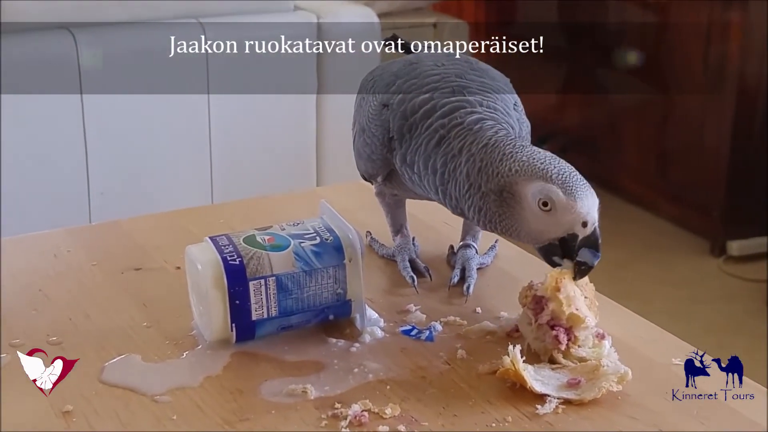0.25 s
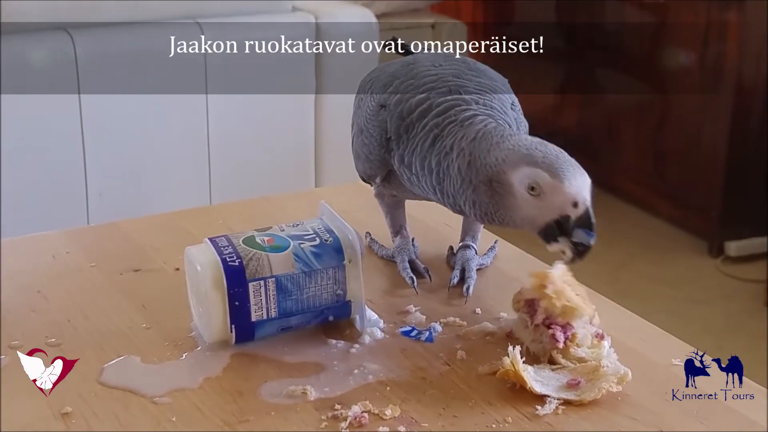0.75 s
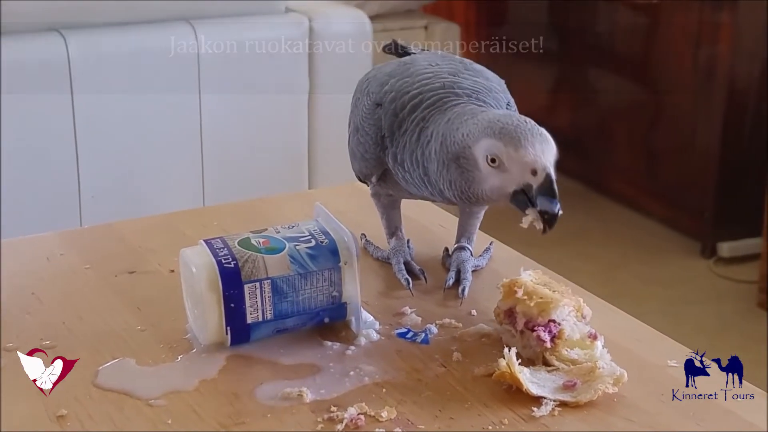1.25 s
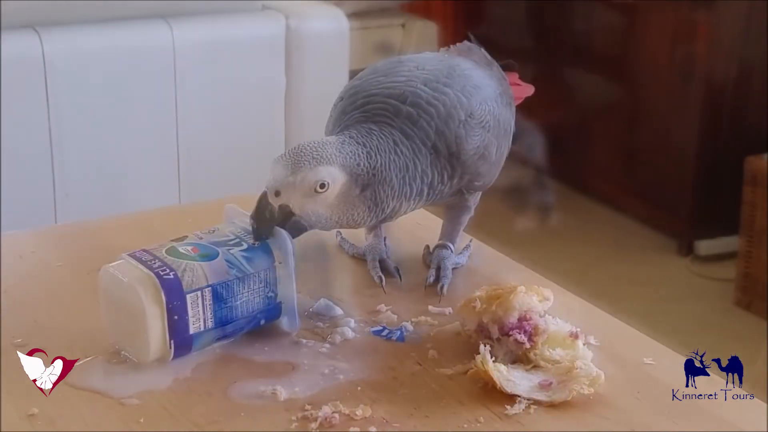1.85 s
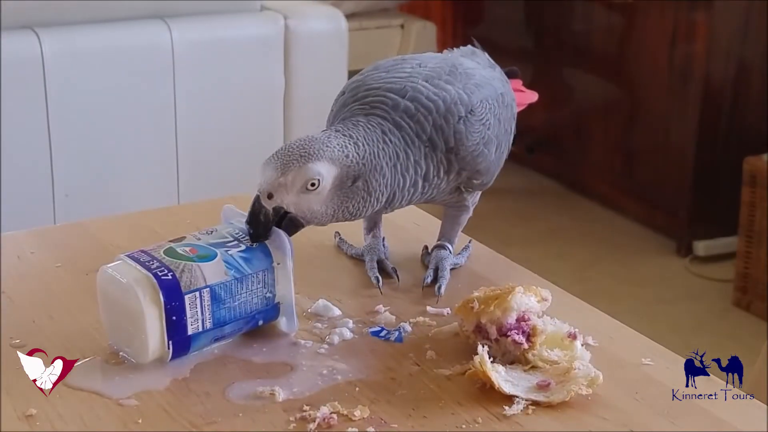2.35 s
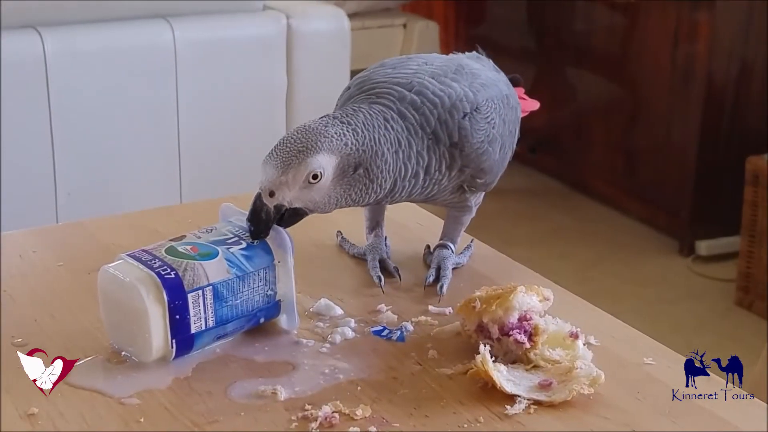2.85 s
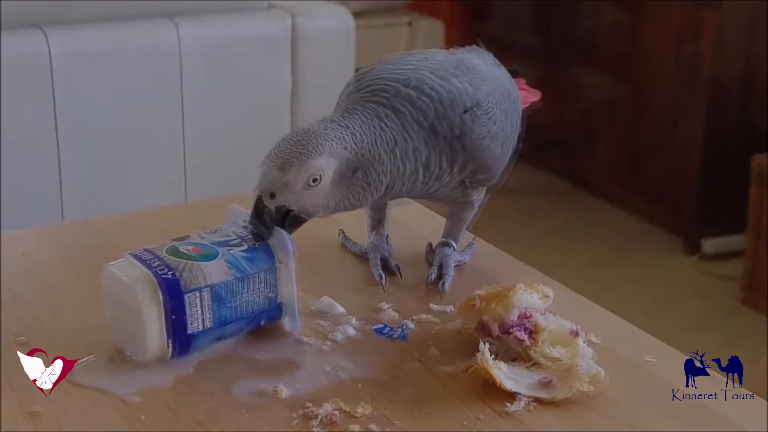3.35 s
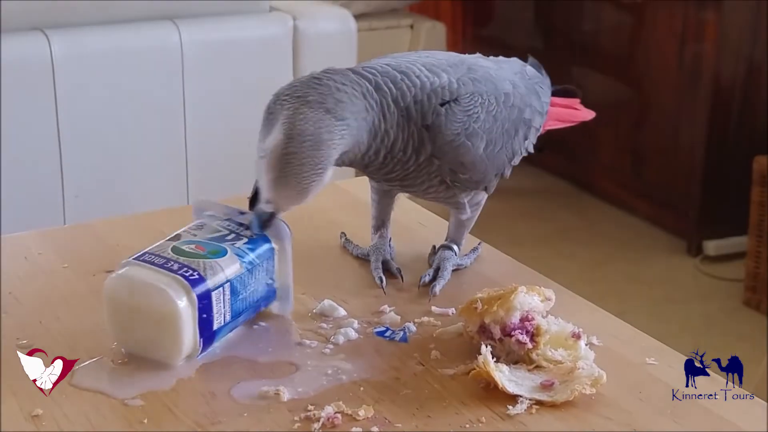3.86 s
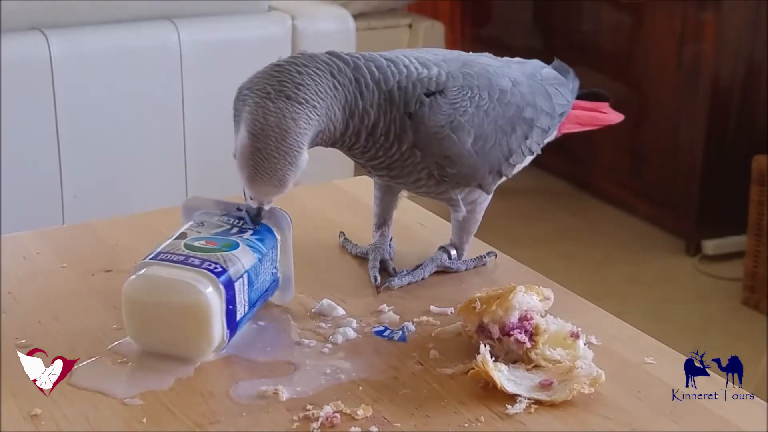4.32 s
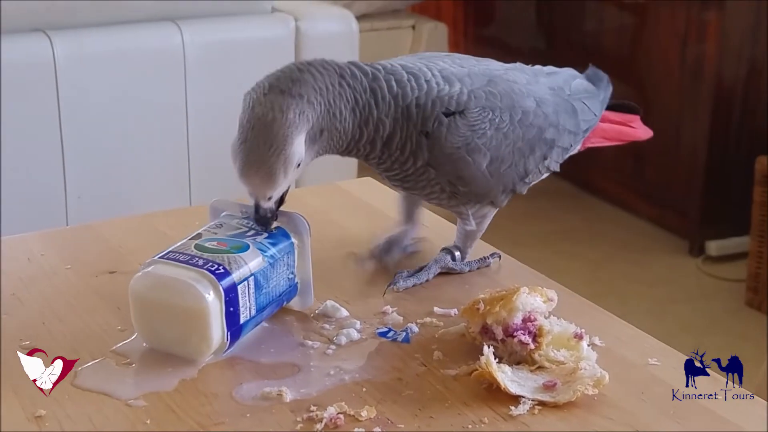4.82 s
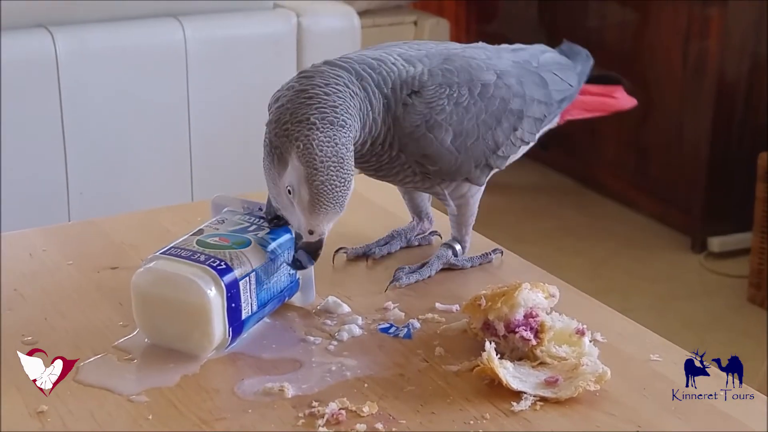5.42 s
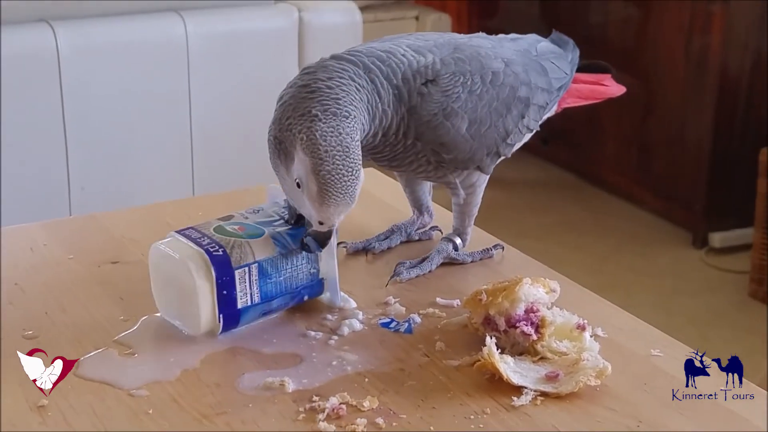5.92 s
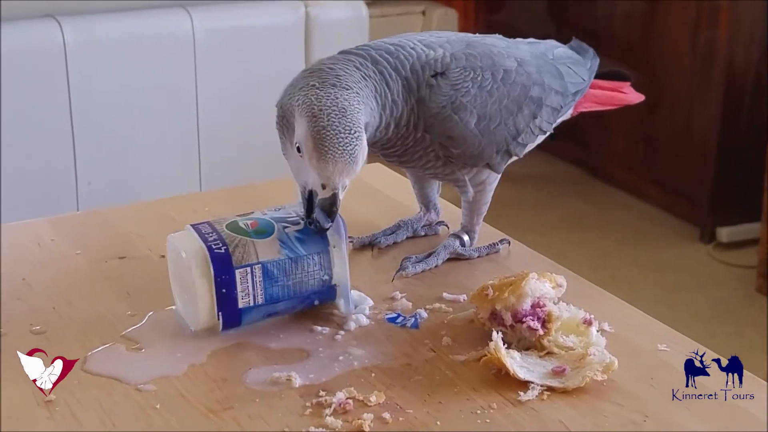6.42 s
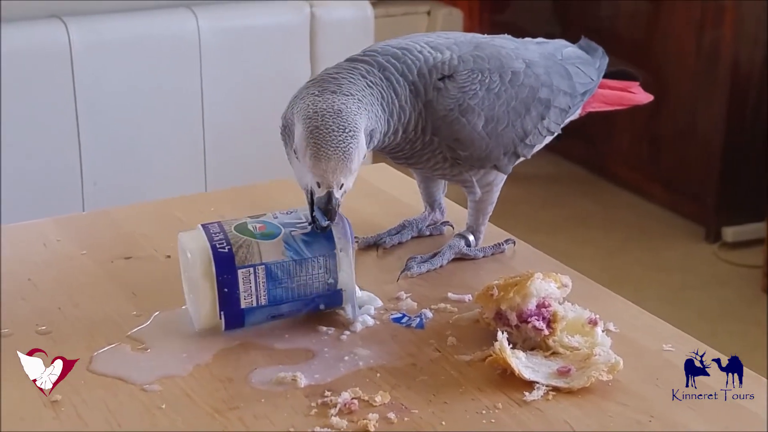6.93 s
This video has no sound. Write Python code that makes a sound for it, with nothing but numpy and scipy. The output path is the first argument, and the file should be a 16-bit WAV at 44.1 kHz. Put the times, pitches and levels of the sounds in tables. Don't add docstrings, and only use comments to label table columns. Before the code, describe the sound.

A parrot works at a light plastic tub on a wooden table. Quiet rubbing and faint hum come first, then small clicks, squeaks and dry ticks, a crunch, hard pecks and hollow knocks. After scattered bites and tugs, the rim snaps free with the loudest crack and a short rattle. Close small microphone with slight hiss, in a hard-walled living room with a short echo.

```python
import sys
import numpy as np
from scipy import signal
from scipy.fft import rfft, irfft, next_fast_len
from scipy.io import wavfile
from scipy.ndimage import uniform_filter1d

SR = 44100
rng = np.random.default_rng(int(sys.argv[2]) if len(sys.argv) > 2 else 0)


def persist_wave(psi):
    counts = np.round(np.clip(psi, -1, 1) * 32767).astype(np.int16)
    wavfile.write(sys.argv[1], SR, np.atleast_2d(counts).T)


def gain_from_decibels(decibels):
    exponent = np.asarray(decibels, float) / 20
    return 10 ** exponent


N = 316638


def evened(x):
    return x / np.sqrt(np.mean(x ** 2) + 1e-20)


def read(points, hz):
    f, value = np.transpose(points)
    return np.interp(np.log(hz + 1), np.log(f + 1), value)


def add(mix, start_s, sound):
    part = mix[round(start_s * SR):][:len(sound)]
    part += sound[:len(part)]


def coloured(x, colour):
    size = next_fast_len(N)
    gain = gain_from_decibels(read(colour, np.fft.rfftfreq(size, 1 / SR)))
    return evened(irfft(rfft(x, size) * gain, size)[:N])


def ring_modes(modes, span, rise_s, spread, uneven_db):
    hz, mode_db, t60 = np.transpose(modes)[:, :, None]
    detune, weight = rng.standard_normal((2, len(modes), 1))
    sign = (-1) ** np.arange(len(modes))[:, None]
    decay_db = -60 * np.maximum(span - 2 * rise_s, 0) / t60
    level = sign * gain_from_decibels(mode_db + uneven_db * weight + decay_db)
    tones = level * np.sin(2 * np.pi * hz * (1 + spread * detune) * span)
    return tones.sum(0) * (1 - np.exp(-(span / rise_s) ** 2))


def strike(events, body, dip_db, contact_s, rise_s, rough, spread, uneven_db, crack_db=-60):
    out, t = np.zeros((4, N)), np.arange(SR // 2) / SR
    touch = t[:int(6 * contact_s * SR)]
    step = np.arange(len(body)) - (len(body) - 1) // 2
    for k, (start_s, peak_db, bright_db, room_db) in enumerate(events):
        group_db = bright_db * step - dip_db * abs(step)
        force = rough * rng.standard_normal(SR // 20)[:len(touch)] * np.exp(-touch / contact_s)
        force[0] = 1
        for g, (modes, db) in enumerate(zip(body, group_db)):
            hz, _, t60 = np.transpose(modes)
            span = t[:int(min(t60.max() + 4 * rise_s, .49) * SR)]
            ring = ring_modes(modes, span, rise_s, spread, uneven_db)
            edges = [hz.min() / 1.31, min(hz.max() * 1.21, SR / 2.3)]
            band = signal.butter(2, edges, "band", fs=SR, output="sos")
            ring = signal.sosfilt(band, ring)
            click = uniform_filter1d(signal.unit_impulse(len(span), int(rise_s * SR) + 1), size=3)
            crack = signal.sosfilt(band, click)
            ring += gain_from_decibels(crack_db) * crack * np.linalg.norm(ring) / np.linalg.norm(crack)
            near = signal.fftconvolve(ring, force)
            near *= gain_from_decibels(peak_db + db) / abs(near).max()
            add(out[0], start_s, near)
            far = gain_from_decibels(room_db) * ring * np.linalg.norm(near) / np.linalg.norm(ring)
            add(out[1 + (k + g) % 3], start_s, far)
    return out


def gripped(events, modes):
    return strike(events, modes, dip_db=0.5, contact_s=0.0018, rise_s=.0001, rough=0.2,
                  spread=0.0078, uneven_db=-0.1, crack_db=-11)


def chirps(events, cycles):
    out = np.zeros(N)
    for start_s, peak_db, pitch_hz in events:
        turns = np.arange(0, 4 * cycles, pitch_hz / SR)
        wobble = 1 + rng.uniform(-0.56, 0.47) / cycles
        ring = np.sin(2 * np.pi * turns) + 3.0 * np.sin(2 * np.pi * wobble * turns + 1)
        ring *= turns * np.exp(-2.5 * turns / cycles)
        add(out, start_s, gain_from_decibels(peak_db) * ring / abs(ring).max())
    return out


# time_s, level_db
DRONE_SWELL = [(0.0, -58), (.38, -54), (.58, -56), (.72, -62), (1.4, -58.5), (1.7, -55), (2.38, -59),
               (2.98, -57), (3.16, -55), (3.58, -52.5), (3.76, -58.5), (4.0, -60.5), (4.2, -56.5),
               (4.78, -58.5), (5.74, -58.5), (6.5, -59.5), (6.96, -58.5), (7.18, -55.5)]
# frequency_hz, density_db
HUM_COLOUR = [(15, -49), (25, -37.5), (54, -7.5), (75, -14.5), (129, -6), (155, -7.5), (205, 2),
              (277, -2.5), (389, -4), (525, -20.5), (832, -3), (1120, -21.5), (1580, -22), (1890, -26),
              (3000, -33.5), (3900, -108), (6600, -120)]


def hum():
    frames, hz = N // 512 + 5, np.fft.rfftfreq(2048, 1 / SR)
    a, b, patches = rng.standard_normal((frames, 1025, 3)).T
    patches = evened(uniform_filter1d(uniform_filter1d(patches, 8, 0), 6, 1))
    time_s, level_db = np.transpose(DRONE_SWELL)
    bright_db = 0.9 * (level_db + 57.5) - 2.5
    t = np.arange(frames) * 512 / SR
    upper = np.clip(np.log2((hz + 1) / 900), 0, 1)[:, None]
    colour = gain_from_decibels(read(HUM_COLOUR, hz))[:, None]
    drift = gain_from_decibels(2.23 * patches + upper * np.interp(t, time_s, bright_db))
    z = (a + 1j * b) * colour * drift
    drone = evened(signal.istft(z, nperseg=2048, noverlap=1536)[1][:N])
    return drone * gain_from_decibels(np.interp(np.arange(N) / SR, time_s, level_db))


# start_s, length_s, pressure_db, extra_crackle_db
STROKES = [(0.023, 0.48, -79, -6), (0.36, 0.11, -81.5, -12), (1.456, 0.23, -78, -5), (1.822, 0.14, -84, 4),
           (1.86, 0.013, -67, -6), (2.037, 0.074, -70.5, -4), (2.22, 0.22, -79, -4), (2.515, 0.22, -73, -1),
           (2.98, 0.14, -70.5, 2), (3.2, 0.17, -70, 2), (3.564, .03, -72, -7), (4.046, 0.015, -65, -6),
           (4.265, 0.14, -75, 0), (4.693, 0.39, -82, -12), (5.014, 0.27, -78.5, 1),
           (5.498, 0.2, -76.5, -0.5), (5.63, .1, -74, 4), (5.72, 0.049, -69, 11), (5.864, .03, -87, 4),
           (5.917, 0.028, -68.5, 1), (6.095, 0.19, -78.5, 1), (6.345, 0.1, -84, 10), (6.583, .05, -77, 8),
           (6.8, .1, -86, 12), (6.987, 0.079, -65.5, 4), (7.093, .08, -67.5, 3)]
# frequency_hz, density_db
SCRAPE_COLOUR = [(590, -49), (1000, 8.5), (1590, -5.5), (1830, -8.5), (2050, -8), (4120, -12), (5500, -11),
                 (8160, -3), (10000, -18), (12500, -22), (15800, -28), (17000, -45)]


def scrape():
    press_db_per_s, let_go_db_per_s = 168.5, 132
    rest_db, rest_fine_db = -84.5, 6
    start, length, pressure_db, fine_db = np.transpose(STROKES)[:, :, None]
    t = np.arange(0, N, 64) / SR
    onset_db = press_db_per_s * np.maximum(start - t, 0)
    release_db = let_go_db_per_s * np.maximum(t - start - length, 0)
    press = gain_from_decibels(pressure_db - onset_db - release_db)
    coarse = np.sqrt((press ** 2).sum(0) + gain_from_decibels(rest_db) ** 2)
    crackle = np.sqrt(((press * gain_from_decibels(fine_db)) ** 2).sum(0) + gain_from_decibels(rest_db + rest_fine_db) ** 2)
    coarse, crackle = (np.interp(np.arange(N) / SR, t, curve) for curve in (coarse, crackle))
    size = gain_from_decibels(2.36 * np.minimum(rng.exponential(1, N), 4.5))
    happens = rng.random(N) < 3500 / SR
    slips = coloured(size * happens * rng.standard_normal(N), SCRAPE_COLOUR)
    fine = signal.sosfilt(signal.butter(3, 8500, "high", fs=SR, output="sos"), slips)
    return gain_from_decibels(5.0) * (coarse * (slips - fine) + crackle * fine)


# frequency_hz, level_db, t60_s
RIM = [
    [(3300, 3, 0.0042), (4220, 7, 0.0052), (5050, 8, 0.0022), (6200, 5.5, 0.0087)],
    [(6500, 0.5, 0.0026), (7300, 7, 0.0037), (8600, 2.5, 0.0052)],
    [(9730, 14, 0.0046), (11900, 22.5, 0.00052), (14000, -14, 0.0022), (14000, -30, 0.0022)],
]
# start_s, peak_db, brightness_db, room_db
NIBBLES = [(.0463, -55, -7.5, -8), (2.1167, -49.5, 5, 0), (2.5184, -55, 10, 3), (2.5781, -47, 6.5, 2),
           (3.0752, -48, 1, -6), (3.7823, -51, 10, -10), (4.4394, -59, 7, -8), (5.8611, -49, 7.5, 0),
           (5.925, -45, 1, -4), (5.944, -43, 0, -22), (6.0946, -52.5, -1, -5)]


def nibbles():
    return strike(NIBBLES, RIM, dip_db=6.5, contact_s=0.0038, rise_s=.00005, rough=0.15,
                  spread=0.078, uneven_db=-1.5)


# frequency_hz, level_db, t60_s
TUB = [
    [(310.7, -8.5, 0.045), (362.4, -3, 0.087), (447, -18, 0.036)],
    [(718.3, 0, 0.06), (792, -7, 0.039), (874, -4.5, 0.043)],
    [(1074, -4.5, 0.057), (1225, 2.5, 0.031), (1258, -3, 0.0182), (1603, -2, 0.026), (2091, -8.5, 0.029)],
]
# start_s, peak_db, brightness_db, room_db
ROCKS = [(.384, -53, -5, -8), (1.848, -47, -4, -27), (2.212, -44.5, -2, -19), (3.712, -54.5, -5, -2),
         (3.958, -53.5, -9, -37), (4.029, -43, -5, -7), (4.3, -58.5, -5.5, 5), (4.33, -61, -6, -4),
         (4.345, -53, -6.5, 3), (4.419, -63, -6, 2), (4.484, -54.5, -1.5, -21), (5.509, -58, 0.5, -20),
         (5.631, -44.5, -1, -3), (5.689, -53.5, 2, 6)]


def rocks():
    return strike(ROCKS, TUB, dip_db=-1.0, contact_s=0.0065, rise_s=0.0048, rough=0.34,
                  spread=0.018, uneven_db=3.0)


# start_s, peak_db, brightness_db, room_db
KNOCKS = [(1.397, -52, 3.5, -4), (1.481, -58.5, 4.5, -14), (2.2075, -42, -6.5, -4.5), (2.495, -64, 12, -8),
          (3.195, -49, 11, -14.5), (3.456, -43, -0.5, -10), (3.523, -32, -2, -13.5), (3.567, -47.5, 9, -5),
          (3.6, -48, 3, -5), (4.014, -40.5, 0, -18), (5.63, -31.5, 1, -7), (5.764, -53.5, 0, 1),
          (6.175, -55.5, 5, 0), (6.277, -62.5, -9.5, 6), (6.576, -52.5, 3.5, -11)]


def knocks():
    return strike(KNOCKS, TUB, dip_db=-0.5, contact_s=0.0058, rise_s=0.00051, rough=0.057,
                  spread=0.038, uneven_db=2.0)


# start_s, peak_db, brightness_db, room_db
FLEXES = [(1.3972, -52, -4, -2.5), (1.4814, -54, -3, -7), (2.2089, -52.5, -23, -5),
          (3.1936, -48.5, 22, -4.5), (3.3423, -48, -15, -6), (3.455, -45.5, -12, -4),
          (3.5239, -40.5, -17, -3.5), (3.5992, -37.5, -19, -7.5), (4.014, -52.5, 5, 5.5),
          (5.6313, -36.5, -4.5, -5), (6.1764, -51, -12, -4)]
# frequency_hz, level_db, t60_s
SIDE_WALL = [
    [(2026, 1, 0.025), (2660, 8, 0.0023), (2890, -1.5, 0.023), (3500, 0, 0.02)],
    [(4180, 0, 0.0093), (4820, 0, 0.005)],
]


def flexes():
    return strike(FLEXES, SIDE_WALL, dip_db=0, contact_s=.003, rise_s=.0003, rough=.17,
                  spread=.012, uneven_db=1.5, crack_db=-2)


# start_s, peak_db, brightness_db, room_db
BITES = [
    (4.0142, -33.5, 9, -5.5),
    (4.1405, -57, 22, -11.5),
    (1.398, -48.5, 18.5, -12),
    (1.4808, -57.5, 21.5, -5),
]
# frequency_hz, level_db, t60_s
BITE_MODES = [
    [(2150, -6, 0.014), (3300, 5, 0.0066), (4030, -5, 0.019), (5260, -4, 0.0054), (6370, 7, 0.0074)],
    [(7440, 7, 0.0014), (8350, 5.5, 0.0044), (9150, 1, 0.0033), (10350, -6, 0.0031), (12400, -17, 0.0022),
     (14400, -25, .002)],
]


def bites():
    return gripped(BITES, BITE_MODES)


# start_s, peak_db
THUMPS = [(1.399, -66), (2.214, -47.5), (2.72, -60), (3.169, -68), (3.518, -52.5), (4.049, -56.5),
          (4.351, -54.5), (4.501, -56.5), (4.753, -57), (4.99, -59), (5.25, -53.5), (5.639, -45),
          (6.169, -59), (6.965, -51)]
# frequency_hz, level_db, t60_s
TABLE = [
    [(64.5, 2, 0.42), (98.4, 3.5, 0.09)],
]


def thumps():
    events = [(start_s, peak_db, 0, -38) for start_s, peak_db in THUMPS]
    return strike(events, TABLE, dip_db=0, contact_s=0.0027, rise_s=.008, rough=.02,
                  spread=.02, uneven_db=1.5)


# start_s, peak_db, pitch_hz
SQUEAKS = [
    (1.842, -56, 1670),
    (1.895, -64, 1720),
    (1.922, -68, 1695),
    (2.51, -63, 3600),
    (2.577, -58.5, 4120),
]


def squeaks():
    return chirps(SQUEAKS, cycles=37)


# start_s, peak_db, pitch_hz
TICKS = [(1.8587, -45, 6170), (2.0333, -59, 7200), (2.0553, -48, 7550), (2.0996, -50, 8200),
         (2.608, -54, 8200), (2.699, -56, 5000), (2.7035, -44, 6500), (2.7055, -52, 8500),
         (2.7195, -58, 4500), (2.73, -53, 7000), (2.7555, -45, 7600), (5.037, -58, 5700),
         (5.136, -60, 3300), (5.185, -62, 7500), (5.222, -56, 5500), (5.9445, -48, 7200),
         (5.951, -54, 13000)]


def ticks():
    return chirps(TICKS, cycles=3)


# start_s, peak_db, pitch_hz
CRUMBS = [(1.9784, -58, 4200), (1.99, -58.5, 4500), (2.052, -57.5, 4130), (2.058, -52, 10900),
          (2.102, -55, 11500), (2.6905, -51, 5500), (2.704, -52.5, 4300), (2.7295, -58, 4000),
          (2.8295, -59, 6200), (2.896, -67, 3670), (4.298, -55, 15300), (4.6, -53.5, 1280),
          (5.1848, -58, 6460), (5.196, -57, 5060), (5.2213, -44.5, 8600), (5.702, -50, 11000),
          (5.885, -56, 13400), (5.905, -53, 15200), (5.921, -52, 6100), (5.944, -43, 14600),
          (5.9524, -45, 8540), (5.9624, -54, 4500), (6.3687, -59, 3670)]


def crumbs():
    return chirps(CRUMBS, cycles=8.3)


# start_s, peak_db, brightness_db, room_db
PECKS = [
    (2.2082, -47.5, 0, -0.5),
    (2.4977, -52, -8, 0),
    (3.3387, -46, -3.5, -0.5),
    (3.455, -50.5, 0, 2),
    (3.523, -42, 1, -0.5),
    (3.5997, -27.5, -2.5, -5.5),
    (5.7097, -34, -3, -9),
    (6.1777, -55, -9, 4),
]


def pecks():
    return strike(PECKS, RIM, dip_db=9, contact_s=0.0027, rise_s=.00005, rough=0.33,
                  spread=0.032, uneven_db=0.0, crack_db=-10)


# start_s, peak_db, brightness_db, room_db
SLIPS = [
    (2.7448, -29.5, -1, -15.5),
    (2.8073, -50.5, 10, -1.5),
    (4.304, -41, -6.5, -15),
    (6.2724, -46, -2, -2),
]


def slips_off():
    return strike(SLIPS, RIM, dip_db=19, contact_s=.0013, rise_s=.00005, rough=.3,
                  spread=.02, uneven_db=1.5)


# start_s, peak_db, brightness_db, room_db
CRUNCHES = [
    (3.1942, -25.5, 1, -4),
]
# frequency_hz, level_db, t60_s
CRUNCH_MODES = [
    [(2740, -20, .004), (4200, 2, 0.01), (4720, 4.5, 0.01), (5250, 1, 0.0045)],
    [(7530, 5, 0.0085), (6400, -10, .003), (8200, 1, 0.0047), (10900, -2.5, 0.0026), (13600, -11, .002)],
]


def crunch():
    return gripped(CRUNCHES, CRUNCH_MODES)


# start_s, peak_db, brightness_db, room_db
TAPS = [
    (3.341, -33, 5, -10.5),
    (4.134, -47.5, 12.5, -10),
    (6.666, -39, 2.5, -13.5),
]


def taps():
    return strike(TAPS, TUB, dip_db=8, contact_s=.0016, rise_s=.0007, rough=.17,
                  spread=.01, uneven_db=1.5)


# start_s, peak_db, brightness_db, room_db
LIFTED = [
    (4.9905, -30, -8.5, -4),
]
# frequency_hz, level_db, t60_s
LIFTED_MODES = [
    [(353, -8, 0.056), (710, 1.5, 0.04), (905, -6.5, .03), (1210, -9, 0.027), (1480, -17, .02)],
    [(1985, 10, 0.045), (2385, -4, .025), (2630, -4, .04), (3640, -4, 0.027), (4400, -3, .012),
     (5970, -6, .012), (7200, -10, .006)],
]


def lifted_tap():
    return strike(LIFTED, LIFTED_MODES, dip_db=2, contact_s=0.0023, rise_s=0.0007, rough=0.27,
                  spread=.001, uneven_db=-0.6, crack_db=-15)


# start_s, peak_db, brightness_db, room_db
TUGS = [
    (6.5775, -35, -5.5, -3),
    (5.6305, -36, 1.5, 1.5),
    (5.7645, -38.5, 7.5, -6.5),
]
# frequency_hz, level_db, t60_s
TUG_MODES = [
    [(2090, -4, 0.0075), (3760, 3.5, 0.0034), (4640, 3.5, .005), (5430, 1.5, 0.0056), (6000, 4.5, 0.005)],
    [(7400, 1.5, 0.0089), (8270, 2, 0.006), (10000, -7, .003), (11700, -1.5, .002), (14600, -9, .002)],
]


def tugs():
    return gripped(TUGS, TUG_MODES)


# start_s, peak_db, brightness_db, room_db
SNAP = [
    (6.9601, -12, -5, -10.5),
    (6.971, -27.5, -5, 3),
    (7.019, -30, -3, 3),
    (7.032, -31.5, -10, 1.5),
    (7.049, -38, 3, -7),
    (7.065, -32, -1, -10),
]
# frequency_hz, level_db, t60_s
SNAP_MODES = [
    [(364, -14.5, 0.014), (461, -4, 0.008), (736, -6, 0.048), (924, -5.5, 0.09), (942, 8.5, 0.011),
     (1018, -2.5, 0.043)],
    [(1190, -2.5, 0.032), (1380, -2.5, 0.009), (1440, -1.5, .012), (1588, -9.5, 0.06), (2200, -0.5, 0.0078)],
]


def snap():
    return strike(SNAP, SNAP_MODES, dip_db=-2.5, contact_s=0.0033, rise_s=0.00032, rough=0.12,
                  spread=.004, uneven_db=2.3, crack_db=-12.5)


# start_s, peak_db, brightness_db, room_db
WHIP = [
    (6.9605, -20, 0, 0.5),
    (6.9705, -29, 1, 3),
    (7.05, -35.5, -9, 2.5),
    (7.07, -40, -10, -6),
]
# frequency_hz, level_db, t60_s
WHIP_MODES = [
    [(2930, -5.5, 0.0089), (3700, -5, 0.003), (4500, -0.5, .007), (4920, 5, 0.007), (5580, 1, 0.004)],
    [(6770, 3, 0.0039), (7460, -6, 0.0066), (8370, 5, 0.0025), (10340, -5.5, 0.0015), (12500, -12, 0.0015),
     (14600, -7, .0015)],
]


def whip():
    return strike(WHIP, WHIP_MODES, dip_db=-2.5, contact_s=0.0031, rise_s=0.00027, rough=0.49,
                  spread=0.0035, uneven_db=2.8, crack_db=-8)


# frequency_hz, t60_s
ROOM_DECAY = [(60, 0.057), (300, 0.09), (800, 0.27), (2000, 0.41), (5000, 0.36), (8000, 0.34),
              (12000, 0.21)]
# delay_s, level_db
WALLS = [(.0075, -19), (.011, -16), (.0165, -15), (.024, -18), (.038, -18)]


def room(x):
    hz, t, z = signal.stft(rng.standard_normal(SR // 2), SR, nperseg=256)
    tail = signal.istft(z * gain_from_decibels(-60 * t / read(ROOM_DECAY, hz)[:, None]), SR, nperseg=256)[1]
    tail *= np.clip(np.arange(len(tail)) / SR / 0.006 - .3, 0, 1)
    tail /= np.linalg.norm(tail)
    for delay_s, db in WALLS:
        tail[round(delay_s * SR * rng.uniform(.9, 1.1))] += gain_from_decibels(db)
    return signal.oaconvolve(x, tail)[:N]


def scene():
    hits = np.zeros((4, N))
    for blows in (nibbles, rocks, knocks, flexes, bites, thumps, pecks, slips_off, crunch, taps,
                  lifted_tap, tugs, snap, whip):
        hits += blows()
    rubbing = scrape()
    cracks = squeaks() + ticks() + crumbs()
    hits[0] += cracks
    hits[2] += gain_from_decibels(-12.5) * cracks
    hits[1] += gain_from_decibels(-5.5) * rubbing
    echoes = sum(room(path) for path in hits[1:])
    return (hits[0] + rubbing + echoes + hum())[None]


# frequency_hz, density_db
HISS_COLOUR = [(1470, -62), (2500, -46), (3680, -16.5), (3980, -16), (4700, -21.5), (4890, -28), (7320, -1),
               (8430, -4), (9720, -23), (11700, -20), (12300, -30), (16500, -40)]
# frequency_hz, width_hz, depth_0_to_1
NOTCHES = [(600, 70, 0.98), (1863, 96, 1), (2547, 140, 0.7), (3230, 73, 0.1)]


def microphone(x):
    x = x + gain_from_decibels(-75.5) * coloured(rng.standard_normal(N), HISS_COLOUR)
    for hz, width_hz, depth in NOTCHES:
        peak = signal.lfilter(*signal.iirpeak(hz, hz / width_hz, SR), x)
        x = x - np.clip(depth, 0, 1) * peak
    return x


# time_s, level_db
TREBLE_DIPS = [(.235, -12), (.352, -30), (.49, -11), (.745, -12), (.915, -10), (1.15, -10), (2.198, -20),
               (2.305, -11), (2.795, -10), (3.993, -22), (4.395, -11), (4.885, -11), (5.587, -14),
               (5.718, -9), (6.548, -18), (6.934, -22), (7.062, -11)]


def thin_treble(x):
    hz, t, z = signal.stft(x, SR, nperseg=512)
    for time_s, db in TREBLE_DIPS:
        level = abs(z[0, :, abs(t - time_s).argmin()])
        spared = level > 1.9 * uniform_filter1d(level, size=15)
        fade = np.clip(1.6 - abs(t - time_s) / .009, 0, 1)
        z[:, (hz > 1600) & ~spared] *= gain_from_decibels(db * fade)
    power = uniform_filter1d(uniform_filter1d(abs(z) ** 2, size=11, axis=1), size=4, axis=2)
    power_db = 10 * np.log10(abs(power) + 1e-20)
    faint = (hz[:, None] > 12100) & (power_db < -109.5)
    z[faint | (hz[:, None] > 16150)] = 0
    return signal.istft(z, SR, nperseg=512)[1][:, :N]


def band_limit(x):
    return signal.sosfilt(signal.butter(12, 16770, fs=SR, output="sos"), x)


def record(dry):
    mix = thin_treble(microphone(dry))
    return band_limit(mix)


dry = scene()
out = record(dry)
persist_wave(out)
```